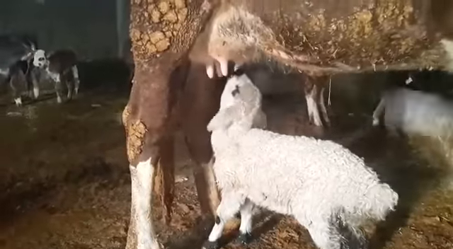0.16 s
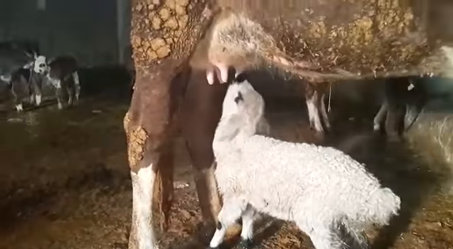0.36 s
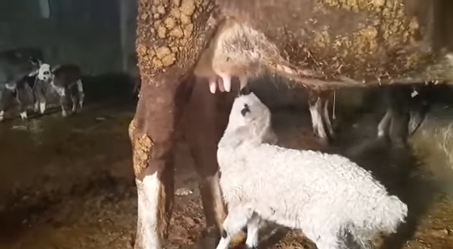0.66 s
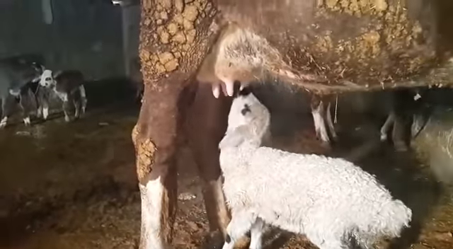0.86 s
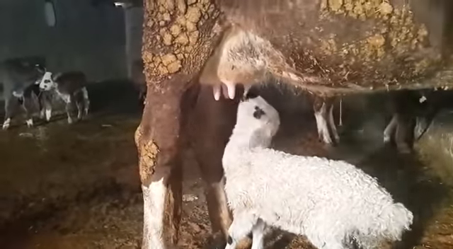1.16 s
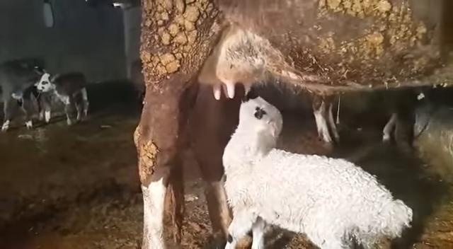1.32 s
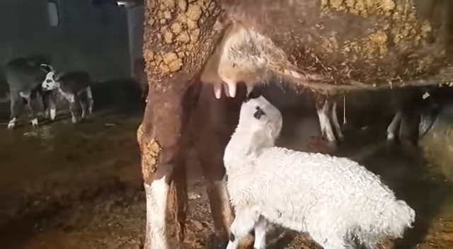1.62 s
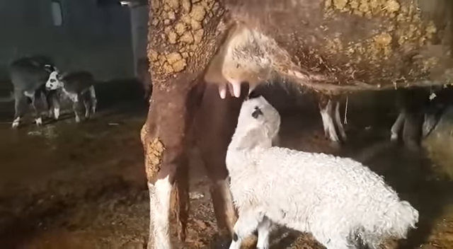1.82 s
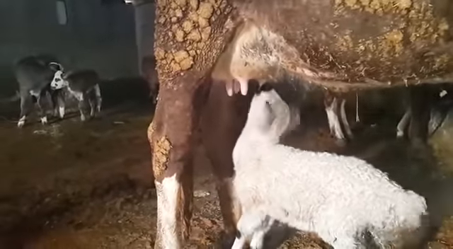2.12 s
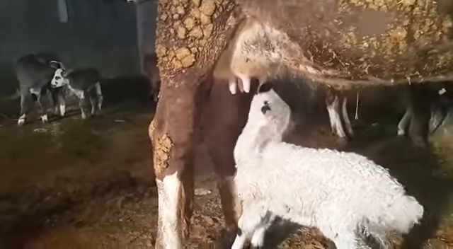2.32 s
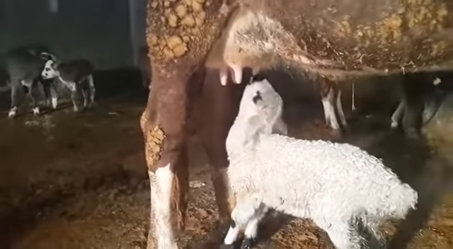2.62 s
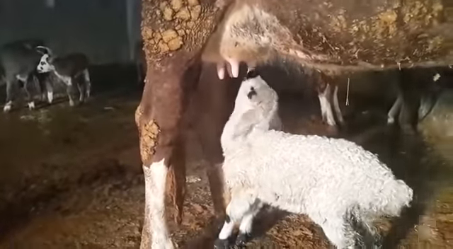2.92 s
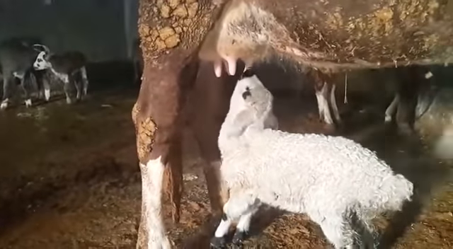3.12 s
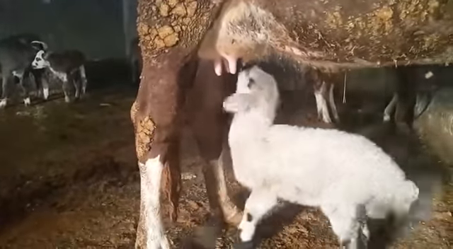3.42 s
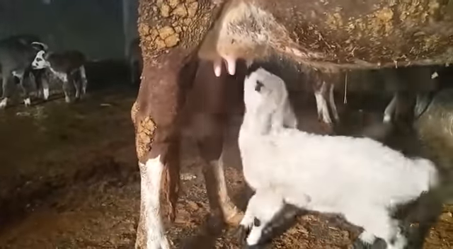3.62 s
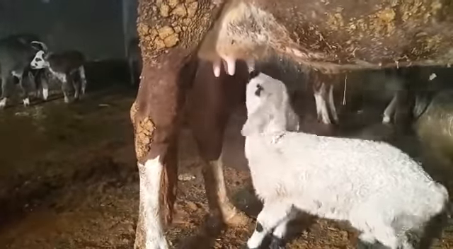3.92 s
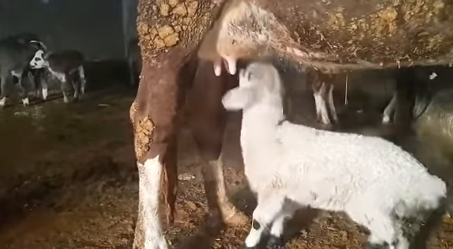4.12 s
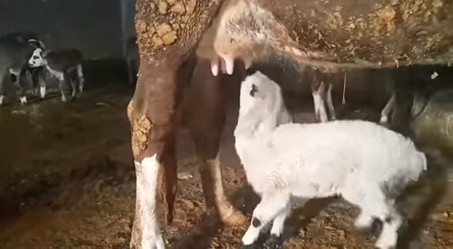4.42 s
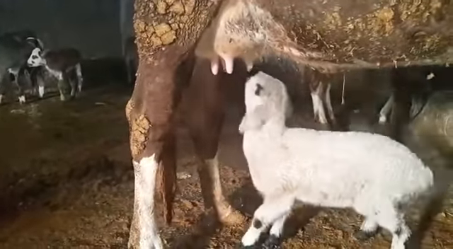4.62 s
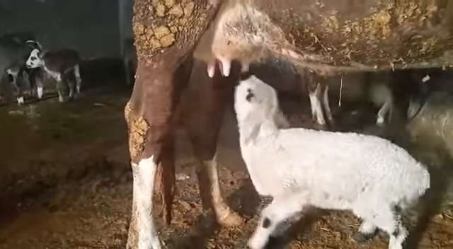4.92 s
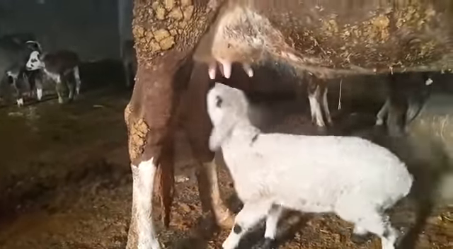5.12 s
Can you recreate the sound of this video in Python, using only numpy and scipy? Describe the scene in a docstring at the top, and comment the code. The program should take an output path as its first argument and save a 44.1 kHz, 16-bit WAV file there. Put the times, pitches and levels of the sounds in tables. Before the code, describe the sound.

A cow's low moo fills the first 1.1 seconds, beginning immediately from a closed-lipped hum, opening and swelling, its pitch near 130 Hz arching gently around 0.65 s. One thin, high ping sounds at about 0.06 s. The voice then sags, turns breathy and gravelly, and ends in a low grunt at 1.05 s. Short early echoes and a brief diffuse tail suggest a barn. Quiet follows, with wet suckling smacks of a lamb at 1.6, 1.85, 1.9, 2.1-2.25 and 2.95 s. Dull hoof steps fall at 1.5, 2.05 and 2.3 s, amid scuffing litter. Shuffling and straw rustle increase from 3.2 to 4 s. Two faint far metal clanks come around 3.3 s, then steps, and a rapid run of tiny bright pings at 3.72-3.76 s. Clearer smacks sound near 4.0, 4.2 and 5.17 s, with more steps from 4.4 to 4.8 s. Soft air noise and wavering low hum continue throughout.

```python
"""A cow moos once in a barn while a high ping sounds: fold pulses and breath ring a modelled throat.
The moo swells, arches in pitch, roughens as it sinks and ends in a grunt of low-coloured clicks.
Wet smacks of a suckling lamb and dull hoof steps follow, as short click clusters, with noisy litter.
Late come two far metal clanks and a run of thin pings, as decaying modes.
Air noise and a wavering hum of sines run throughout; echoes and a diffuse tail set the barn."""
import sys
import numpy as np
from scipy import signal
from scipy.fft import rfft, irfft
from scipy.io import wavfile
from scipy.ndimage import uniform_filter1d

SR = 44100
rng = np.random.default_rng(int(sys.argv[2]) if len(sys.argv) > 2 else 0)


def persist_wave(psi):
    """Save psi, clipped to +-1, as 16-bit WAV."""
    counts = np.round(np.clip(psi, -1, 1) * 32767).astype(np.int16)
    wavfile.write(sys.argv[1], SR, np.atleast_2d(counts).T)


N = 231939
TIME_S = np.arange(N) / SR

# still air spectrum: frequency_hz, relative_density_db
AIR_SPECTRUM = [(15, -48), (25, -23.5), (47, -15.5), (70, -1.5), (179, -2.5), (299, -4), (729, -13),
                (1090, -8.5), (1280, -27), (2260, -11), (2890, -26.5), (5230, -17), (7420, -36),
                (11400, -24), (15800, -31)]
# rustling litter spectrum: frequency_hz, relative_density_db
LITTER_SPECTRUM = [(30, -42.5), (110, -22.5), (300, 3.5), (1000, 2), (2200, -4.5), (4500, -9),
                   (7000, -22.5), (15000, -29.5)]
# left-right likeness of background noise: frequency_hz, correlation (-1 to 1)
PORT_LIKENESS = [(60, 0.86), (130, 0.83), (290, 0.78), (640, 0.37), (1410, -0.36), (3100, 0.004),
                 (6820, -0.11), (15000, 0.0)]
# left-right lean of background noise: frequency_hz, left_minus_right_db
PORT_LEAN = [(60, 0.5), (110, 2), (200, 5), (380, 2.0), (700, 1), (1290, 1.5), (2380, 3), (4400, -2),
             (8120, 4.5), (15000, 4)]
# low hum partials: frequency_hz, rms_db (before pan)
HUM_PARTIALS = [(73.5, -62.5), (224, -69), (292, -68.5)]
# shuffling bouts: start_s, length_s, scuff_db, rustle_db (levels before the gains in shuffling)
SHUFFLES = [(1.37, 0.11, -50, -100), (2.3, 0.36, -56, -71), (3.22, 0.21, -48.5, -59),
            (3.491, 0.27, -47.5, -57), (3.807, 0.2, -51.5, -54), (4.343, 0.05, -62, -59)]
SHUFFLE_RISE_S, SHUFFLE_FADE_S = 0.076, 0.067
# floor under the bouts, before the same gains
RESTLESS_SCUFF_DB, RESTLESS_RUSTLE_DB = -56.5, -63

# diffuse barn decay: frequency_hz, t60_s
BARN_DECAY = [(150, 0.7), (500, 0.34), (1100, 0.48), (2200, 0.46), (5000, 0.25), (12000, 0.025)]
# room resonances in the tail: frequency_hz, width_hz, lift_db
BARN_MODES = [(515, 40, 2), (1060, 110, 6)]
# direct sound and first reflections: delay_ms, right_lag_ms, left_gain, right_gain
ECHOES = [(0.0, 0.0865, 0.88, 0.78), (2.087, 0.282, -0.42, -0.36), (2.853, -0.15, -0.35, -0.21),
          (7.215, 0.97, -0.14, 0.048), (11.165, -0.11, 0.32, 0.18), (11.962, 0.018, 0.29, 0.38),
          (12.795, -0.42, -0.14, -0.22), (13.966, -0.55, 0.41, 0.01), (23.86, 0.245, 0.38, 0.38),
          (25.51, 0.36, -0.12, -0.19), (28.02, -0.417, 0.23, 0.29)]

# far metal clanks: start_s, level_db (before the gains in clanks)
CLANKS = [(3.2877, -35.5), (3.343, -33)]
# clank modes: frequency_hz, relative_level_db, t60_s
CLANK_MODES = [(1130, -5, 1), (1048, -6, 0.3), (1760, 1, 0.11), (2400, -7.5, 0.59)]
# thin high pings: start_s, level_db (before the gains in pings), left_minus_right_db
PINGS = [(.0624, -33.5, 0), (3.7217, -32.5, -2), (3.731, -31.5, -1.5), (3.748, -29, -8),
         (3.755, -23.5, -18), (3.7625, -19.5, -4)]
# ping modes: frequency_hz, relative_level_db, t60_s
PING_MODES = [(11960, -5, .13), (12090, -7, .04), (12260, -19, .25), (14440, -15, .1), (14700, -9, .03),
              (14870, -12, .07)]
# soft hoof steps: start_s, level_db (before the gain in steps), centre_hz
STEPS = [(1.489, -58, 310), (2.05, -47, 270), (2.313, -45.5, 656), (3.574, -42.5, 700), (3.61, -43, 796),
         (3.701, -41, 218), (3.75, -55, 209), (4.435, -42.5, 269), (4.506, -45, 700), (4.667, -54, 515),
         (4.795, -39.5, 333)]
# wet smacks: start_s, level_db, centre_hz, length_s, spray_floor_db (above 1 kHz), hollow_tone_db
# (level_db and hollow_tone_db before the gains in smacks)
SMACKS = [(1.601, -39, 1900, 0.0052, -29, -3), (1.618, -51, 3000, 0.005, -22, -10),
          (1.848, -47.5, 4530, 0.0051, -21, -21), (1.9093, -35, 2620, 0.011, -24.5, -10),
          (2.115, -49, 3500, 0.0097, -24, -12), (2.135, -48, 5000, 0.022, -19, -3),
          (2.255, -52.5, 3770, 0.027, -13, -9), (2.955, -42, 1850, 0.0046, -27, 21),
          (3.581, -40.5, 2130, 0.0099, -30, 2), (3.7194, -42.5, 5460, 0.0068, -22, -17),
          (3.982, -26.5, 3020, 0.0062, -33, -12), (3.991, -33, 2410, 0.013, -22, -17),
          (4.188, -38, 2950, 0.013, -20, 1), (4.2034, -38, 3100, 0.016, -13.5, -4),
          (4.863, -43.5, 1680, 0.009, -27, -6), (5.1659, -31, 4300, 0.01, -24.5, -1)]

# voice slope, before the registers are levelled: frequency_hz, gain_db
VOICE_SLOPE = [(50, -43.5), (130, -39), (265, -21), (800, -11), (1400, -12.5), (2600, -19.5), (3800, -23.5),
               (4500, -32), (5200, -34.5), (6400, -50), (8000, -56.5), (10000, -70), (16000, -88)]
# vowel resonances, likewise: frequency_hz, width_hz, first_lift_db, brighter_lift_db
FORMANTS = [(412, 70, 18, 7.5), (510, 92, 6.5, 15), (1041, 110, 7, 10), (1721, 118, 6, 15),
            (2097, 139, 15, 13.5), (3275, 52, -2, 9), (4307, 73, 13.5, 8)]
# timbre shift: time_s, share of the brighter resonance set (0 to 1)
TIMBRE_SHIFT = [(0, 0), (.24, 0.16), (.33, 0.9), (.43, 0.89), (.52, 0.65), (.68, 0.06), (.8, 1), (.88, 0.5),
                (.95, 0.63)]
# splits between voice registers: edge_hz
REGISTER_EDGES_HZ = (190, 330, 700, 1400, 2500, 5400)
# rows: chest, nose, low vowel, high vowel, upper formants, treble, fizz level_db, then its change:
# lips_shut_db, arch_top_db, brighter_share_db, folds_slack_db
REGISTERS = [(-43, 6, -1, -3, -4.5), (-36, -5.5, 4, -7.5, 1.5), (-21.5, -23.5, 2, -1.5, 0),
             (-27.5, -10.5, 3.5, -3, 2.5), (-24.5, -31, -1.5, 6.3, -4.5), (-28.5, -13.5, 1.85, -2, -6),
             (-53.5, -2, 3, -4.5, -4)]
NASAL_DB = 8  # the nose rings while the lips part

# pitch scoops up to a low note, lifts into an arch, then sags ever faster as the air runs out
LOW_HZ, TOP_HZ, TOP_S, ARCH_HZ_PER_S2 = 129.0, 137.0, 0.652, 45
SCOOP_HZ, SCOOP_S, WAVER_RMS_HZ = 1.6, 0.06, 0.09
SAG_HZ, SAG_AT_S, SAG_GROWS_S, LOWEST_HZ = 17, 1.0, 0.068, 94
# roughness 0-1: low on a steady note, higher at the start and in glides (Hz per s)
ROUGH_STEADY, ROUGH_PER_HZ_PER_S, ROUGH_START, ROUGH_MOST = .028, .0015, .08, .55
# lips part after a hum; folds slacken late; the call stops
PART_S, PARTING_S, SLACK_S, SLACKENING_S, END_S, RELEASE_S = 0.032, 0.046, 0.76, 0.24, 1.115, 0.125
# closing grunt
GRUNT_S, GRUNT_LENGTH_S, GRUNT_DB, GRUNT_HZ = 1.045, 0.04, -32.5, 95

EDGE_HZ = 15900


def amp(db):
    """Decibels to gain."""
    return 10 ** (np.asarray(db) / 20)


def unit(x):
    """Scales to an rms of 1."""
    return x / np.sqrt(np.mean(abs(x) ** 2) + 1e-20)


def read(points, hz):
    """Interpolates a spectrum at hz on a log axis."""
    points_hz, value = np.transpose(points)
    return np.interp(np.log(hz + 1), np.log(points_hz + 1), value)


def ramp(start_s, length_s):
    """Rises from 0 to 1 over length_s."""
    return np.clip((TIME_S - start_s) / length_s, 0, 1)


def add(mix, start_s, sound):
    """Mixes a sound in at start_s."""
    part = mix[:, max(round(start_s * SR), 0):][:, :sound.shape[-1]]
    part += sound[..., :part.shape[1]]


def pan(left_minus_right_db):
    """Left and right gains for a level difference."""
    return amp([[left_minus_right_db / 2], [-left_minus_right_db / 2]])


def colour(x, db_at):
    """Minimum-phase filter whose gain in dB is db_at(Hz)."""
    size = 8192
    hz = abs(np.fft.fftfreq(size, 1 / SR))
    log_gain = np.log(amp(np.maximum(db_at(hz), -110)))
    response = np.exp(np.conj(signal.hilbert(log_gain)))
    impulse = np.fft.ifft(response).real[:size // 2]
    return signal.fftconvolve(x, impulse)[:len(x)]


def below(x, edge_hz, order=4):
    """Zero-phase low-pass under edge_hz."""
    sos = signal.butter(order, edge_hz, fs=SR, output="sos")
    return signal.sosfiltfilt(sos, x, padtype="even")


def hump(f, centre_hz, sigma_octaves, depth_db):
    """Broad Gaussian resonance in dB: top 0, floor -depth_db."""
    return depth_db * (np.exp(-.5 * (np.log2((f + 1) / centre_hz) / sigma_octaves) ** 2) - 1)


def lifts(peaks, f):
    """Summed Gaussian resonances (Hz, width Hz, dB) as a gain in dB."""
    return sum(db * np.exp(-.5 * ((f - hz) / width_hz) ** 2) for hz, width_hz, db in peaks)


def wander(max_hz):
    """Slow noise of rms 1, band-limited below max_hz."""
    spectrum = rfft(rng.standard_normal(N))
    return unit(irfft(spectrum * (np.fft.rfftfreq(N, 1 / SR) < max_hz), N))


def burst(length_s, db_at, density):
    """Cluster of tiny coloured clicks, scaled so its energy equals rms 1/4 held for length_s."""
    t = np.arange(SR // 6) / SR
    u = t / length_s
    clicks = rng.choice([-1., 1.], len(t)) * (rng.random(len(t)) < density)
    envelope = np.minimum(u / 0.18, 1) * (np.exp(-u ** 2) + 0.074 * np.exp(-u / 4))
    sound = colour(clicks * envelope, db_at)
    return sound / (4 * np.sqrt(np.sum(sound ** 2) / (length_s * SR)) + 1e-12)


def ring(modes, rattle_rad):
    """Dying modes with random phase per port; a loose part's rattle blurs their phase."""
    t = np.arange(SR // 2) / SR
    out = np.zeros((2, len(t)))
    for hz, db, t60_s in modes:
        shake = unit(uniform_filter1d(rng.standard_normal(len(t)), size=500))
        turns = hz * t + rng.random((2, 1))
        out += amp(db - 60 * t / t60_s) * np.sin(2 * np.pi * turns + rattle_rad * shake)
    return out * np.minimum(t / 0.00033, 1)


def noise(spectrum, patchy_db):
    """Two-port coloured noise with drifting spectral patches, rms 1."""
    hz = np.fft.rfftfreq(1024, 1 / SR)
    a, b, c, d, patches = rng.standard_normal((5, len(hz), N // 256 + 5))
    patches = uniform_filter1d(patches, size=14, axis=0)
    patches = unit(uniform_filter1d(patches, size=9, axis=1))
    same = np.clip(read(PORT_LIKENESS, hz), -1, 1)[:, None]
    left = a + 1j * b
    right = same * left + np.sqrt(1 - same ** 2) * (c + 1j * d)
    lean_db = read(PORT_LEAN, hz)[:, None] / 2
    level_db = read(spectrum, hz)[:, None] + patchy_db * patches
    ports = np.array([left, right]) * amp(level_db + np.array([lean_db, -lean_db]))
    return unit(signal.istft(ports, nperseg=1024, noverlap=768)[1][:, :N])


def air():
    """Still barn air: steady coloured noise."""
    return amp(-57.5) * noise(AIR_SPECTRUM, patchy_db=.7)


def hum():
    """Low hum: sines wavering in level and phase."""
    out = 0
    for hz, db in HUM_PARTIALS:
        level = 1 + 0.24 * wander(6.9)
        phase = 2 * np.pi * hz * TIME_S + .8 * wander(8)
        out = out + amp(db) * unit(level * np.sin(phase))
    return out * pan(2)


def shuffling_levels_db():
    """Scuff and rustle levels: bouts rise, hold and fade over a restless floor, adding in power."""
    power = amp([[RESTLESS_SCUFF_DB], [RESTLESS_RUSTLE_DB]]) ** 2
    for start_s, length_s, scuff_db, rustle_db in SHUFFLES:
        fade = np.exp(-np.maximum(TIME_S - start_s - length_s, 0) / SHUFFLE_FADE_S)
        bout = ramp(start_s, SHUFFLE_RISE_S) * fade
        power = power + (amp([[scuff_db], [rustle_db]]) * bout) ** 2
    return 10 * np.log10(power)


def straws():
    """Single straws snap: sparse clicks of varied size, part shared between ports."""
    sizes = amp(4 * np.minimum(rng.exponential(1, (2, N)), 3))
    snaps = (rng.random((2, N)) < 120 / SR) * rng.standard_normal((2, N)) * sizes
    shared = snaps + .5 * snaps[::-1]
    crackle = np.array([colour(side, lambda f: read(LITTER_SPECTRUM, f)) for side in shared])
    return unit(crackle - below(crackle, 700))


def shuffling(scuff_gain_db=-2, crisp_gain_db=-3, crackle_gain_db=-9):
    """Animals shift in litter: dull scuffing below 2.3 kHz, crisp rustle above, snapping straws."""
    scuff_db, rustle_db = shuffling_levels_db()
    litter = noise(LITTER_SPECTRUM, patchy_db=2)
    dull = below(litter, 2300)
    rustle = amp(crisp_gain_db) * unit(litter - dull) + amp(crackle_gain_db) * straws()
    return amp(scuff_db + scuff_gain_db) * unit(dull) + amp(rustle_db) * rustle


def background():
    """Air, hum and shuffling summed."""
    return air() + shuffling() + hum()


def barn(x, onset_s=0.011):
    """Diffuse tail: sparse taps, thin bass, decay per band, lows alike at both ports."""
    taps = rng.standard_normal((2, SR)) * (rng.random((2, SR)) < 3000 / SR)
    taps[1] += below(taps[0] - taps[1], 640, order=2)
    onset = np.clip(np.arange(SR) / SR / onset_s - .5, 0, 1)
    hz, t, bands = signal.stft(taps * onset, SR, nperseg=256)
    decay = amp(-60 * t / read(BARN_DECAY, hz)[:, None])
    tail = signal.istft(bands * decay, SR)[1]
    fed = colour(x.mean(0), lambda f: lifts(BARN_MODES, f))
    fed -= below(fed, 170)
    return signal.fftconvolve(fed[None], tail / np.linalg.norm(tail[0]), axes=1)[:, :N]


def reflections(x):
    """Direct sound and first echoes as delays and gains per port."""
    turn_per_ms = -2j * np.pi * np.fft.rfftfreq(N, 1 / SR) / 1000
    ports = 0
    for delay_ms, right_lag_ms, left_gain, right_gain in ECHOES:
        left = left_gain * np.exp(turn_per_ms * delay_ms)
        right = right_gain * np.exp(turn_per_ms * (delay_ms + right_lag_ms))
        ports = ports + np.array([left, right])
    return irfft(rfft(x) * ports, N)


def clanks(knock_gain_db=4, ring_gain_db=-7):
    """Far metal: a knock of clicks, then rattling modes."""
    out = np.zeros((2, N))
    for start_s, db in CLANKS:
        knock = burst(0.0072, lambda f: hump(f, 1180, 1.28, 33.4), 0.74)
        add(out, start_s, amp(db + knock_gain_db) * pan(4.0) * knock)
        add(out, start_s, amp(db + ring_gain_db) * pan(2.7) * ring(CLANK_MODES, rattle_rad=1.15))
    return out


def pings(ring_gain_db=-3, tick_gain_db=-15):
    """Something tiny and hard close by: high modes and a bright tick."""
    out = np.zeros((2, N))
    for start_s, db, side_db in PINGS:
        add(out, start_s, amp(db + ring_gain_db) * pan(side_db) * ring(PING_MODES, rattle_rad=.2))
        tick = burst(0.0047, lambda f: hump(f, 14000, 3.6, 25), .4)
        add(out, start_s, amp(db + tick_gain_db) * tick)
    return out


def steps(gain_db=4):
    """Hooves land on packed earth with a dull puff."""
    out = np.zeros((2, N))
    for start_s, db, centre_hz in STEPS:
        puff = burst(.016, lambda f: hump(f, centre_hz, 1.5, 50), .2)
        add(out, start_s, amp(db + gain_db) * puff)
    return out


def smacks(gain_db=2, hollow_gain_db=1, side_db=0.5):
    """Lips part from the teat: films of milk snap inside the small mouth."""
    out = np.zeros((2, N))
    for start_s, db, centre_hz, length_s, spray_db, hollow_db in SMACKS:
        def mouth(f):
            """Lip resonance, hollow of the mouth, and fine spray."""
            lips = hump(f, centre_hz, 1.22, 27)
            hollow = hump(f, 1150, 1.44, 38) + hollow_db + hollow_gain_db
            rolloff_db = 20 * np.log10(1 + (f / 5800) ** 8)
            return np.maximum(np.maximum(lips, hollow) - rolloff_db, spray_db - 40 * (f < 1000))
        shared, left, right = (burst(length_s, mouth, .4) for _ in range(3))
        wet = 1.28 * shared + 1.42 * np.array([left, right])
        add(out, start_s, amp(db + gain_db) * pan(side_db) * wet)
    return out


def grunt():
    """The slack folds flap a last few times: clicks coloured low."""
    out = np.zeros((2, N))
    flaps = burst(GRUNT_LENGTH_S, lambda f: hump(f, GRUNT_HZ, 0.62, 50), 0.32)
    add(out, GRUNT_S, amp(GRUNT_DB) * flaps)
    return out


def pitch():
    """Arching note, and the same note with scoop and final sag, in Hz."""
    note_hz = np.maximum(LOW_HZ, TOP_HZ - ARCH_HZ_PER_S2 * (TIME_S - TOP_S) ** 2)
    sag_hz = SAG_HZ * np.exp((TIME_S - SAG_AT_S) / SAG_GROWS_S)
    scoop_hz = SCOOP_HZ * np.exp(-TIME_S / SCOOP_S)
    return note_hz, np.maximum(note_hz - sag_hz - scoop_hz, LOWEST_HZ)


def folds_and_breath(hz, rough, breath=.03, rasp=0.8):
    """Vocal fold pulses and puffs of air; roughness jitters the rhythm and trades pulses for puffs."""
    jitter = .075 * rough * wander(90)
    waver_hz = WAVER_RMS_HZ * wander(12)
    cycle = np.cumsum((hz + waver_hz) * (1 + jitter)) / SR % 1
    pulses = unit(np.sinc(161 * (cycle - .5)) - 1 / 161)
    puff_shape = 0.12 + np.exp(-((cycle - .5) % 1) / 0.25)
    puffs = unit(puff_shape * rng.standard_normal(N))
    shimmer = 1 + .45 * rough * wander(70)
    drive = (1 - rough) * pulses * shimmer + (breath + rasp * rough) * puffs
    return drive / np.hypot(1 - rough, rasp * rough)


def throat(x, brighter_share):
    """Resonances colour the voice, crossfading between a first and a brighter set of lifts."""
    first_colour = [(hz, width_hz, db) for hz, width_hz, db, _ in FORMANTS]
    brighter_colour = [(hz, width_hz, db) for hz, width_hz, _, db in FORMANTS]

    def vowel(peaks):
        """Voice slope with one set of formants."""
        return colour(x, lambda f: read(VOICE_SLOPE, f) + lifts(peaks, f))
    return (1 - brighter_share) * vowel(first_colour) + brighter_share * vowel(brighter_colour)


def disperse(x, width_hz):
    """All-pass per formant: spreads each pulse in time, as scattered reflections soften a distant call."""
    r = np.exp(-np.pi * width_hz / SR)
    for hz, *_ in FORMANTS:
        poles = [1, -2 * r * np.cos(2 * np.pi * hz / SR), r * r]
        x = signal.lfilter(poles[::-1], poles, x)
    return x


def registers(voice, shut_lips, arch, brighter_share, slack):
    """Lips, effort, timbre shift and slackening weigh on each band differently."""
    lowpassed = [below(voice, edge_hz, order=8) for edge_hz in REGISTER_EDGES_HZ]
    bands = np.diff([0 * voice, *lowpassed, voice], axis=0)
    levels_db = np.array(REGISTERS) @ np.array([np.ones(N), shut_lips, arch, brighter_share, slack])
    levels_db[1] += NASAL_DB * np.sin(np.pi * shut_lips)
    # each band is scaled to unit deviation over the first second
    return sum(band / np.std(band[:SR]) * amp(db) for band, db in zip(bands, levels_db))


def moo():
    """Folds and breath ring the throat; the folds lose their rhythm as the pitch sinks."""
    note_hz, hz = pitch()
    shut_lips, slack = 1 - ramp(PART_S, PARTING_S), ramp(SLACK_S, SLACKENING_S)
    brighter_share = np.interp(TIME_S, *np.transpose(TIMBRE_SHIFT))
    arch = (note_hz - LOW_HZ) / (TOP_HZ - LOW_HZ)
    glide_hz_per_s = abs(np.gradient(hz, TIME_S))
    rough = ROUGH_STEADY + ROUGH_START * shut_lips + ROUGH_PER_HZ_PER_S * glide_hz_per_s
    rough = np.minimum(rough + (hz <= LOWEST_HZ), ROUGH_MOST)  # roughest at the lowest pitch
    voice = disperse(throat(folds_and_breath(hz, rough), brighter_share), width_hz=380)
    call = registers(voice, shut_lips, arch, brighter_share, slack)
    return call * (1 - ramp(END_S - RELEASE_S, RELEASE_S))


def scene(moo_room_db=-14, near_room_db=-15):
    """The cow and the small sounds share the barn."""
    near = clanks() + pings() + steps() + smacks()
    cow = reflections(moo()) + grunt()
    room = barn(amp(moo_room_db) * cow + amp(near_room_db) * near)
    return background() + room + near + cow


def record(dry):
    """Linear-phase low-pass at EDGE_HZ."""
    taps = signal.firwin(511, EDGE_HZ, window=("kaiser", 9), fs=SR)
    return signal.oaconvolve(dry, taps[None], "same")


dry = scene()
out = record(dry)
persist_wave(out)
```